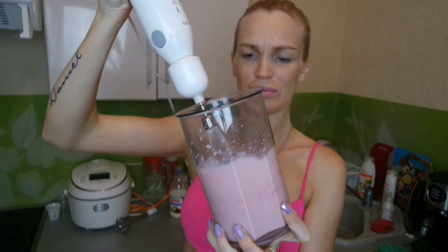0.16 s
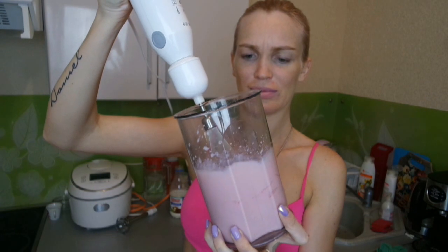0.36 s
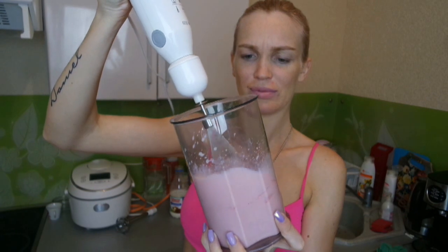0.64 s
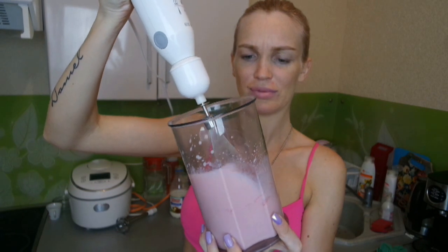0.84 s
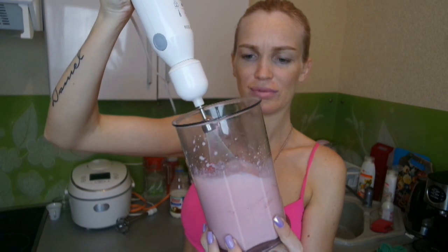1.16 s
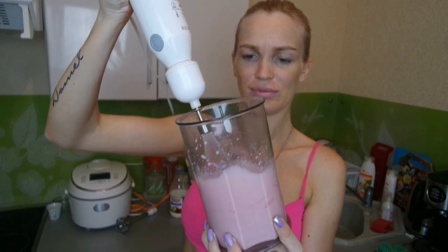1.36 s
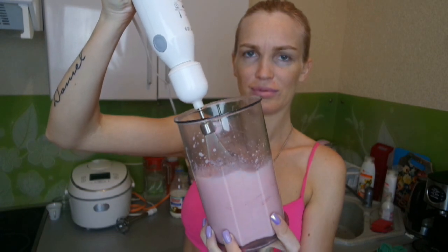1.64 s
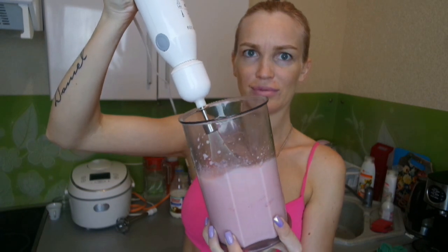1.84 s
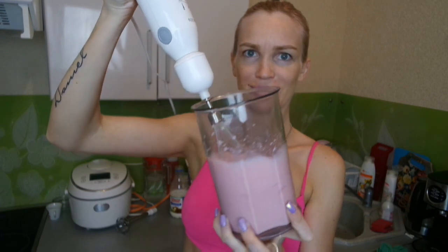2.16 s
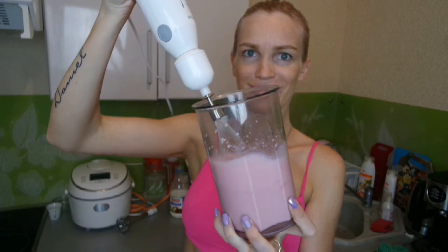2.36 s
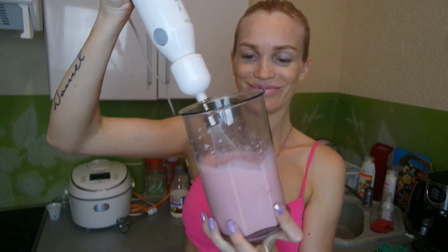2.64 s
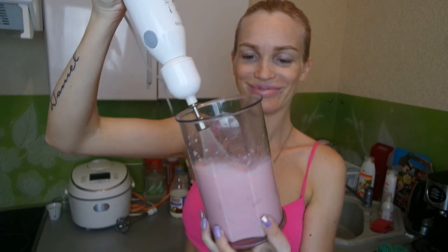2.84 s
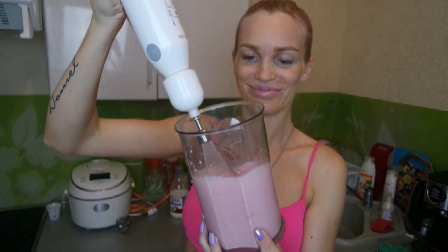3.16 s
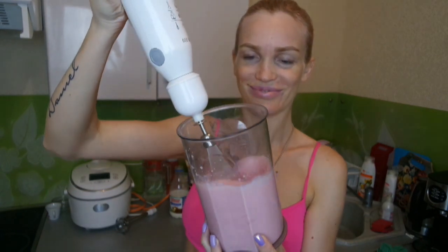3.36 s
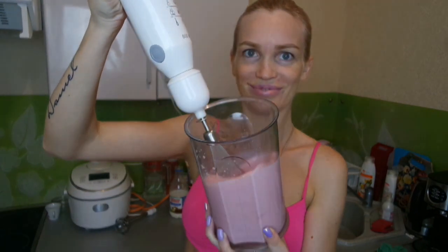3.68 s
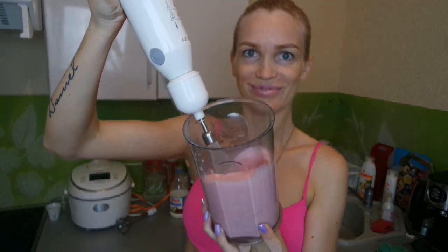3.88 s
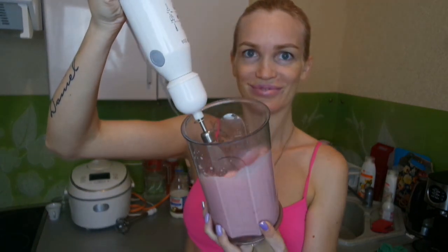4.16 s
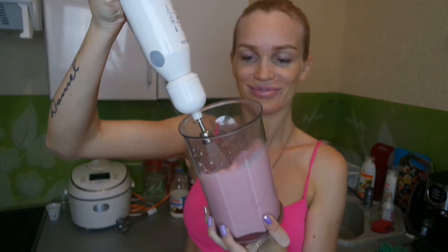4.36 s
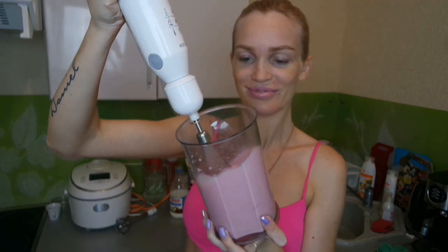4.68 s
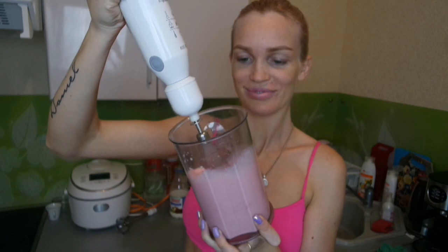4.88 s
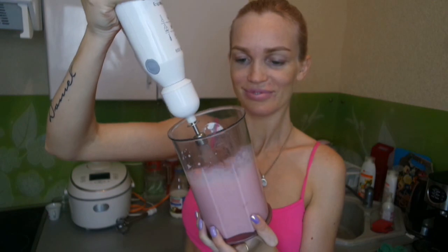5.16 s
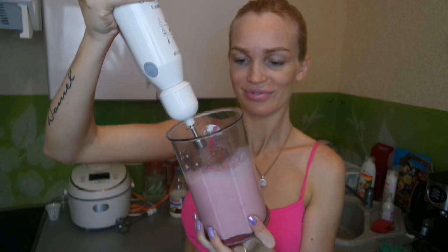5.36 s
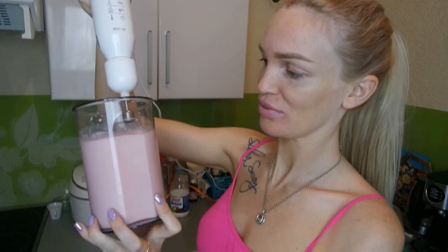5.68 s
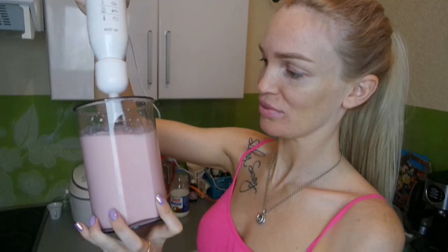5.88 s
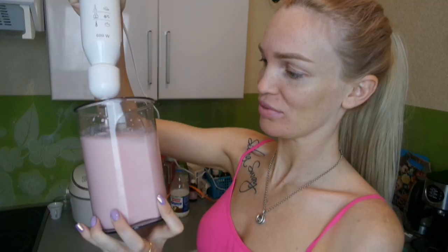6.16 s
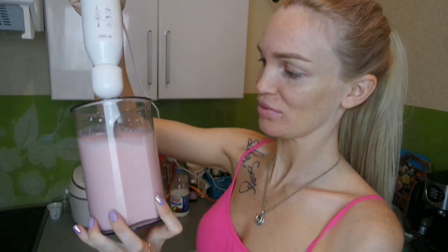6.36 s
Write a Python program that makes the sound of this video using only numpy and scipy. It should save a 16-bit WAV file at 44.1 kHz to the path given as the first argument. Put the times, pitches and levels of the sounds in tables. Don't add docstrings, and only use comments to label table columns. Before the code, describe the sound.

Continuous harsh, buzzing electric whisk in a plastic beaker, with fast gear rattle, hollow wall knocks, wiry scrapes and sharp cracks that briefly dip the loudness.

```python
import sys
import numpy as np
from scipy import signal
from scipy.fft import rfft, irfft, next_fast_len
from scipy.io import wavfile
from scipy.ndimage import uniform_filter1d, map_coordinates

SR = 44100
rng = np.random.default_rng(int(sys.argv[2]) if len(sys.argv) > 2 else 0)


def rack_gain(trim_db):
    fader = np.asarray(trim_db, float)
    return 10 ** (fader / 20)


def inscribe(sig):
    pcm = np.round(np.clip(np.atleast_2d(sig).T, -1, 1) * 32767)
    wavfile.write(sys.argv[1], SR, pcm.astype(np.int16))


N = 287532

# (frequency [Hz], level tilted [dB], level turned [dB], t60 [s])
COVER_MODES = [(1890, -4, -13, .02), (2180, -1, -6, .03), (2270, -5, 1, .035), (2550, -2, -11, .02),
               (2770, -6, -8, .02)]


def unit(x):
    return x / np.sqrt(np.mean(x ** 2, -1, keepdims=True) + 1e-20)


def curves(rows):
    s, *cols = np.transpose(rows)
    return [np.interp(np.arange(N) / SR, s, c) for c in cols]


def wobble(rate):
    return map_coordinates(rng.standard_normal(int(N * rate / SR) + 4), [np.arange(N) * rate / SR])


def filtered(x, response):
    m = next_fast_len(N + 8192)
    return irfft(rfft(x, m) * response(np.fft.rfftfreq(m, 1 / SR)), m)[..., :N]


def colour(points):
    hz, db = np.transpose(points)
    return lambda f: rack_gain(np.interp(np.log(f + 1), np.log(hz), db))


def peak(f, hz, width, db):
    return 1 + (rack_gain(db) - 1) / (1 + (2 * (f - hz) / width) ** 2)


def band(low_hz, high_hz):
    def above(f, hz):
        return 1 / (1 + (hz / (f + 1)) ** 8)
    return lambda f: np.sqrt(np.abs(above(f, low_hz) - above(f, high_hz)))


def impulses(times, sizes):
    return np.bincount(np.clip(times * SR, 0, N - 1).astype(int).ravel(), sizes.ravel(), N)


def bursts(times, sizes, life):
    pole = np.exp(-1 / (life * SR))
    return signal.lfilter([np.e / (life * SR)], [1, -2 * pole, pole ** 2], impulses(times - life, sizes))


def machine(angle):
    # (angle [turns], gearbox tilted [dB], gearbox turned [dB],
    # housing [dB], vent [dB])
    teeth = np.array([(0.039, 9.5, 3, -2, 15), (0.089, -18, -15, 10, 0), (.15, 5, 2, -30, 4),
                      (0.211, 10.5, 18.5, -12, 14), (0.288, 9, -14, 10.5, 15), (0.328, -11, 3, 12.5, -15),
                      (0.412, 3, 13, 8, -10), (0.538, 8, 0, 7, 17.5), (0.578, 9.5, 8, -25, 8),
                      (0.8, -41, -28, 4, 23.5), (0.839, -20, 3, 6, 10), (0.951, 13, -8, 0, -23)])
    turned_blow_db = [-14, -19, -12, 1.5, -10, -21, -13, -11, -2, -12, -19, -13]
    # (depth [dB], angle [turns])
    leans = [(0, 0.24), (0.5, 0.091), (0, 0.23), (1.5, 0.21), (0, .1)]
    borders_hz = [0, *[1100, 3600, 8600, 12400], 1e9]
    # (frequency [Hz], width [Hz], level [dB])
    shell_modes = [(588, 35, 4), (700, 40, 4), (947, 25, 4), (1437, 40, 3), (1896, 60, 2.5),
                   (2178, 50, 2.5), (2295, 30, 3), (2551, 55, 2.5), (3800, 500, -2.5), (4532, 90, 3),
                   (6335, 200, 2.5), (10900, 1300, 2.5)]
    # (frequency [Hz], level [dB per Hz])
    tilted_colour = [(150, -53), (250, -32), (292, -21), (593, -6), (717, -4.5), (781, -10), (945, -6.5),
                     (1030, -8.5), (2200, 0), (3960, -4), (6210, 1.5), (8040, -6), (11200, -4),
                     (14500, -14.5), (15500, -13)]
    # (frequency [Hz], level [dB per Hz])
    turned_colour = [(150, -54), (250, -29), (624, -17), (681, -15.5), (852, -17.5), (945, -14.5),
                     (1560, -11), (2240, -5), (2530, -7.5), (3630, -11.5), (5690, -3), (7640, -9.5),
                     (13000, -11), (14500, -14), (15500, -28)]
    # (frequency [Hz], level [dB per Hz])
    upright_colour = [(150, -57), (250, -21.5), (347, -18.5), (614, -13.5), (669, -20), (768, -12),
                      (1670, -8), (2200, -1.5), (3160, -5.5), (5790, 1.5), (8470, -5), (14500, -6.5),
                      (15500, -8)]
    grip_db = [-18.5, -18, -16.5]

    *levels_db, slack, _ = effort()
    levels_db.append(levels_db[-1])
    turns = np.arange(int(angle[-1]) + 1)[:, None]
    chance = rng.standard_normal((7, len(turns), len(teeth)))
    times = np.interp(turns + teeth[:, 0] + .0015 * chance[5], angle, np.arange(N) / SR)
    at = np.clip(times * SR, 0, N - 1).astype(int)
    turned = 1 - grips()[0][at]
    gear_db = (1 - turned) * teeth[:, 1] + turned * teeth[:, 2]

    tooth_db = [gear_db - 8.5, gear_db - 7.5, teeth[:, 3], teeth[:, 4], teeth[:, 4] - 7]
    lives_s = [.004, 0.0012, 0.00075, 0.00043, 0.0012]
    repeat_shares = [.35, 0.58, 0.014, .03, 0.023]
    parts = 0
    for k, (depth_db, phase) in enumerate(leans):
        force = slack[at] * rack_gain(tooth_db[k] - 11 + 2.4 * chance[k])
        lean_db = depth_db * np.cos(2 * np.pi * (angle - phase)) + 0.83 * wobble(14) + 0.51 * wobble(150)
        shape = rack_gain(lean_db) * (1 + bursts(times, force, lives_s[k]))
        shape = shape / np.sqrt(uniform_filter1d(shape ** 2, size=7000))
        share = repeat_shares[k]
        noise = np.sqrt(share) * repeating(angle, 0.85) + np.sqrt(1 - share) * rng.standard_normal(N)
        parts = parts + filtered(rack_gain(levels_db[k]) * shape * noise, band(borders_hz[k], borders_hz[k + 1]))
    parts = patchy(parts, depth_db=0.84)
    parts = filtered(parts, lambda f: np.prod([peak(f, *mode) for mode in shell_modes], 0))

    cover = filtered(parts, lambda f: peak(f, 2850, 160, 3.7))
    voices = [(parts, tilted_colour), (cover, turned_colour), (parts, upright_colour)]
    held = [rack_gain(db) * unit(filtered(x, colour(points))) for (x, points), db in zip(voices, grip_db)]
    blows = slack[at] * rack_gain(gear_db + levels_db[1][at] + 2.4 * chance[6] - 31)
    booms = rack_gain(turned_blow_db + 1.3 * chance[6] - 14.5) * grips()[1][at]
    _, tilted_db, turned_db, _ = np.transpose(COVER_MODES)
    tilted_clacks = clacks(times, blows * (1 - turned), tilted_db)
    return np.sum(grips() * held, 0) + tilted_clacks + clacks(times, booms * turned, turned_db)


def clacks(times, sizes, mode_db):
    t, out = np.arange(2000) / SR, 0
    for (hz, _, _, t60), db in zip(COVER_MODES, mode_db):
        signs = rng.choice([-1, 1], sizes.shape[1])
        blows = impulses(times - .002, sizes * signs)
        ring = np.sin(2 * np.pi * hz * t) * (1 - np.exp(-t / 0.0017)) * rack_gain(db - 60 * t / t60)
        out = out + signal.oaconvolve(blows, ring)[:N]
    return out


def repeating(angle, memory, size=2330):
    rows = rng.standard_normal((int(angle[-1]) + 30, size))
    rows = signal.lfilter([1], [1, -memory], rows, axis=0)[20:]
    return unit(rows.ravel()[(angle * size).astype(int)])


def patchy(x, depth_db):
    z = signal.stft(x, nperseg=1024)[2]
    field = uniform_filter1d(rng.standard_normal(z.shape), size=3, axis=0)
    field = uniform_filter1d(field, size=5, axis=1)
    return signal.istft(z * rack_gain(depth_db * field / field.std()), nperseg=1024)[1][:N]


def effort():
    # (time [s], motor load [dB], slosh in the beaker [dB], gear slack [0-1])
    work = [(0, 1, 3, 0.75), (.3, -0.5, .5, .95), (.5, -1.76, -2, 0.66), (1.1, 0, -1, 0.85),
            (1.6, -0.45, -1.5, 0.8), (2.5, 0.04, -2.5, 0.88), (2.76, -.8, -7, .9), (2.82, 0.5, 1.2, 0.95),
            (3.55, 1.04, 2.6, .8), (3.8, -0.5, 9.5, 0.5), (4.2, -0.2, 8.5, 0.8), (4.35, 0, 4, 0.74),
            (5.06, -1, 0, 0.4), (5.1, .8, 5, 0.66), (5.76, 2.2, 1.2, 0.52), (6.05, -2.5, -1, 0.45),
            (6.25, -0.8, 2, .35), (6.52, -1.7, 4, 0.05)]
    by_load = [0.62, 0.94, 1.2, 0.68, 0.59]
    by_slosh = [0.9, 0.081, -0.095, -0.22, 0.25]
    # (time [s], level [dB])
    vent_facing = [(0, 3.5), (.35, 3.5), (.5, 2.2), (3.5, 1.4), (3.7, .5), (4.6, -0.7), (5.8, -0.5),
                   (5.95, -4.5), (6.2, -1.5), (6.52, 3)]
    hum_grip_db = [-54, -54.5, -56]
    load_db, slosh_db, slack = curves(work)
    *parts_db, vent_db, hum_db = np.outer(by_load, load_db) + np.outer(by_slosh, slosh_db)
    return *parts_db, vent_db + curves(vent_facing)[0], slack, hum_grip_db @ grips() + hum_db


def grips():
    # (start [s], end [s])
    grip_changes = [
        (4.45, 4.6),
        (5.75, 5.82),
    ]
    t = np.arange(N) / SR
    first, second = [np.interp(t, span, [0, 1]) for span in grip_changes]
    return np.array([1 - first, first - second, second])


def beaker():
    # (time [s], peak [dB], frequency [Hz])
    knocks = [(0.045, -14, 584), (0.11, -14, 610), (.172, -18, 673), (0.216, -11.5, 733), (0.28, -7.5, 578),
              (0.743, -16, 594), (1.748, -18, 593), (1.906, -18.5, 650), (2.55, -27, 704),
              (2.818, -9.5, 690), (2.977, -21, 694), (3.25, -11.5, 598), (3.284, -9.5, 717),
              (3.376, -17, 684), (3.402, -15, 757), (3.438, -20, 700), (3.516, -12, 688), (3.616, -6, 669),
              (3.68, -21, 700), (3.72, -12, 588), (3.754, -13.5, 717), (3.872, -19, 662), (4.194, -14, 724),
              (4.255, -18, 680), (5.121, -16.5, 663), (5.196, -15, 714), (5.25, -15, 702), (5.29, -20, 767),
              (5.422, -19, 740), (5.845, -14, 1070)]
    # (start [s], length [s], first peak [dB], gain a turn [dB], frequency [Hz])
    knock_runs = [
        (0.849, .07, -11, -6.5, 616),
        (1.058, .23, -16.5, 0.4, 670),
        (2.112, .07, -23, 2, 583),
        (5.514, .13, -19, 3.5, 718),
        (5.833, .07, -19, 2.5, 1040),
        (6.393, .13, -14.5, -4.5, 990),
    ]
    # (time [s], peak [dB])
    strikes = [
        (1.2675, -8),
        (2.813, -9),
        (3.617, -10),
        (3.772, -6),
        (3.986, -12),
        (4.226, -11),
        (5.592, -8),
        (5.793, -1.5),
        (5.848, -10),
        (6.455, -10),
    ]
    turn_s = .0525
    hits = list(knocks)
    for s, length, db, gain_db, hz in knock_runs:
        hits += [(s + k * turn_s, db + k * gain_db, hz) for k in range(int(length / turn_s) + 1)]

    out, t = np.zeros(N + SR), np.arange(SR // 12) / SR
    for s, db, hz in hits:
        for late in [0, rng.uniform(0.00913, 0.01213)]:
            other_hz = 590 + 700 - hz if hz < 800 else .9 * hz
            ring = np.sin(2 * np.pi * hz * t) + 0.35 * np.sin(2 * np.pi * other_hz * t)
            ring *= (1 - np.exp(-t / 0.0049)) * rack_gain(-60 * t / 0.04)
            out[round((s + late - .002) * SR):][:len(t)] += rack_gain(db - 470 * late) * ring
    for s, db in strikes:
        rough_phase = rng.standard_normal(len(t)).cumsum() / 3
        crack = np.sin(2 * np.pi * 5200 * t + rough_phase) * rack_gain(-60 * t / .003)
        crack += 0.12 * np.sin(2 * np.pi * 2300 * t) * rack_gain(-60 * t / 0.008)
        out[round((s - .0004) * SR):][:len(t)] += rack_gain(db) * crack / np.abs(crack).max()
    return filtered(out[:N], lambda f: 1 / (1 + (330 / (f + 1)) ** 4))


def wires(angle):
    # (time [s], level [dB], angle [turns], wire ring [dB])
    rub = [(0, -36, .16, -8), (.8, -35, 0.14, 2.5), (1.25, -29, 0.05, 1), (1.5, -33, .14, -3),
           (2.7, -37, 0.2, -3), (2.85, -29, .38, -3), (3.5, -33, 0.36, -1), (3.7, -21.5, 0.55, -1),
           (4, -20, 0.3, -4), (4.22, -19, 0.36, -1), (4.45, -24, 0.5, -5), (4.65, -37, .59, -3),
           (5.7, -36, 0.72, 0), (5.82, -20, .48, .5), (5.94, -22.5, 0.62, 2), (6.1, -30.5, 0.39, 2.5),
           (6.35, -30.5, 0.094, 12), (6.52, -22, 0.071, 1)]
    # (frequency [Hz], level [dB per Hz])
    scrape_colour = [(300, -30), (700, -13), (1200, -4), (2500, 0.5), (3800, -7), (4500, 0.5), (5200, -9),
                     (8000, -6.5), (12500, -6), (15300, -12)]
    # (frequency [Hz], level [dB per Hz])
    ring_colour = [(9000, -44), (10500, -12), (12500, -7), (14000, -3), (14700, 3), (15300, -5)]
    level_db, place, ring_db = curves(rub)
    turns = np.arange(int(angle[-1]))[:, None]
    chance = rng.standard_normal((len(turns), 15))
    contacts = turns + 0.0506 * np.arange(7) + 0.022 * chance[:, :7]
    times = np.interp(contacts, angle - place + 0.061, np.arange(N) / SR)
    sizes = rack_gain(-.9 * np.arange(7) + 2 * chance[:, 7:14] + 1.8 * chance[:, 14:])
    scrape = unit(.72 + bursts(times, sizes, 0.00079)) * rng.standard_normal(N)
    ring = unit(.65 + bursts(times[:, :5], sizes[:, :5], 0.0016)) * rng.standard_normal(N)
    scrape = unit(filtered(scrape, colour(scrape_colour)))
    ring = unit(filtered(ring, colour(ring_colour)))
    return rack_gain(level_db) * (scrape + rack_gain(ring_db - 4) * ring)


def hum(angle):
    orders = [11, 4, 7, 8, 9, 10, 12, 13, 14, 121]
    orders_db = [9, -16.5, -21, -40, -13.5, -22, -4, -11, -43, 10]
    lines = 0
    for k, db in zip(orders, orders_db):
        level = rack_gain(db + 0.69 * wobble(6))
        lines = lines + level * np.sin(2 * np.pi * k * angle + .022 * k ** 0.54 * wobble(25))
    sway_db = 2 * wobble(4.2)
    return rack_gain(effort()[-1] + sway_db - 4.5) * lines


def rumble():
    shake_db = -63.5 + 4 * wobble(5.11)
    drone_db = -59.5 + 3 * wobble(6.14) + 6.5 * grips()[2]
    shake_colour = [(8, -30), (20, -8), (27, 4), (40, -14), (70, -24), (200, -60), (400, -120)]
    drone_colour = [(30, -40), (60, -14), (110, -9.5), (170, 0.5), (260, 1.0), (400, -34), (800, -120)]
    shake = filtered(rng.standard_normal(N), colour(shake_colour))
    drone = filtered(rng.standard_normal(N), colour(drone_colour))
    return rack_gain(shake_db) * unit(shake) + rack_gain(drone_db) * unit(drone)


def ducking(release_db=75):
    # (time [s], cut [dB], hold [s])
    ducks = [
        (1.266, 11, 0.17),
        (2.832, 4.5, 0.18),
        (3.62, 4.5, .2),
        (3.778, 10.5, 0.4),
        (4.223, 9.5, .1),
        (4.278, 10, 0.2),
        (5.791, 7, 0.22),
        (6.453, 4, .2),
    ]
    t, cuts = np.arange(N) / SR, []
    for s, db, hold in ducks:
        cut_db = np.clip(db - release_db * np.maximum(t - s - hold, 0), 0, None)
        cuts.append(cut_db * np.clip((t - s) / 0.0011, 0, 1))
    return rack_gain(-np.max(cuts, 0))


def scene():
    # (time [s], angle [turns])
    whisk_turns = [(0.0, 0.029), (0.25, 4.747), (1.0, 18.981), (1.5, 28.452), (3.0, 56.846), (3.25, 61.567),
                   (4.0, 75.687), (4.25, 80.366), (4.5, 85.085), (5.75, 108.817), (6.25, 118.161),
                   (6.52, 123.146)]
    angle = curves(whisk_turns)[0]
    ducked = ducking() * (machine(angle) + wires(angle) + hum(angle) + rumble())
    return (ducked + beaker())[None]


def band_limit(x):
    return signal.sosfilt(signal.butter(12, 16220, fs=SR, output="sos"), x)


def record(dry):
    mix = filtered(dry, lambda f: f < 15030)
    return band_limit(mix)


dry = scene()
out = record(dry)
inscribe(out)
```